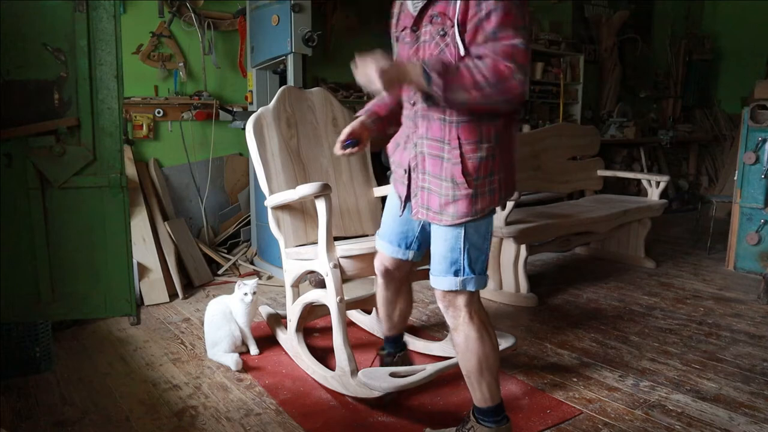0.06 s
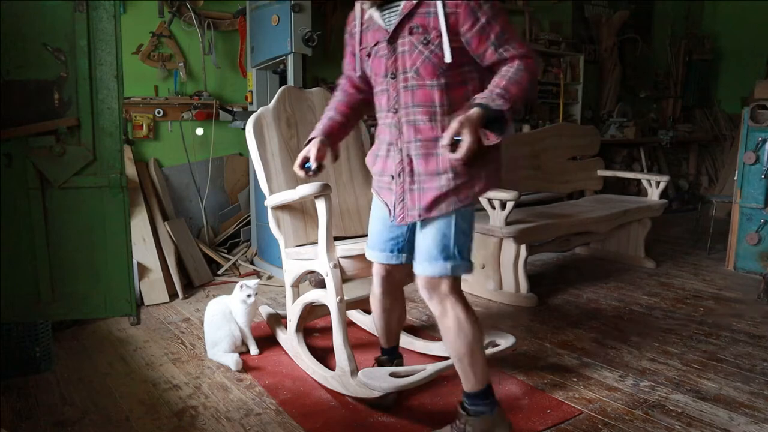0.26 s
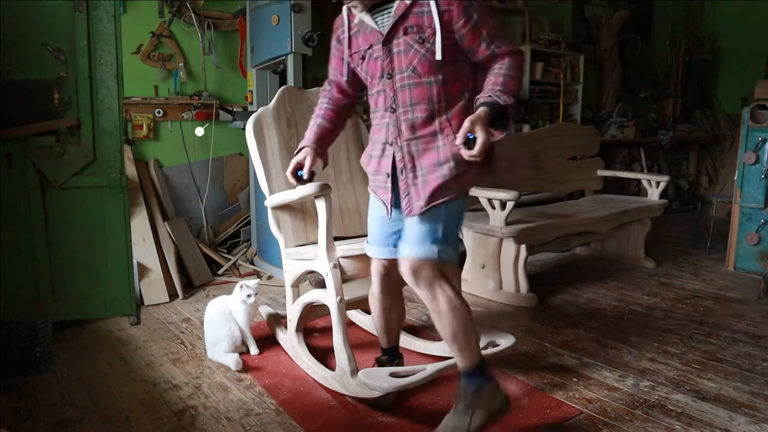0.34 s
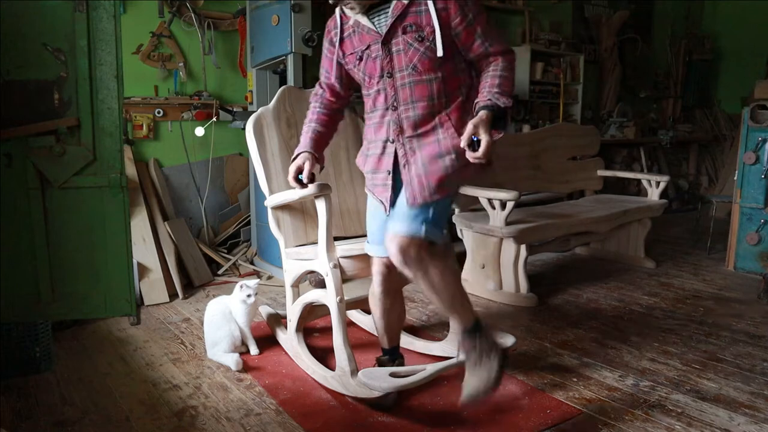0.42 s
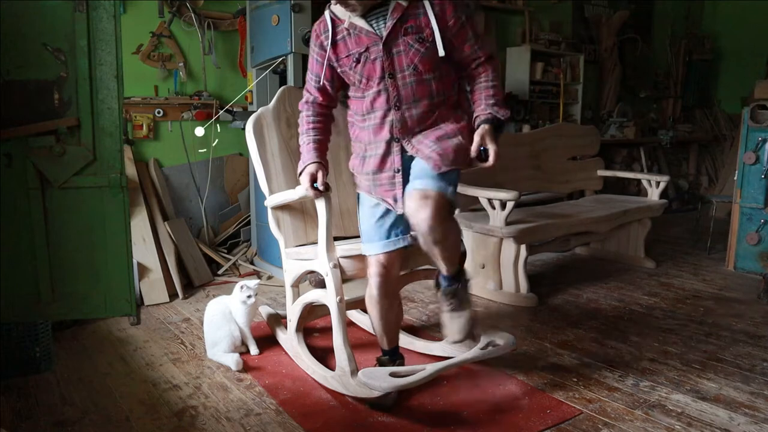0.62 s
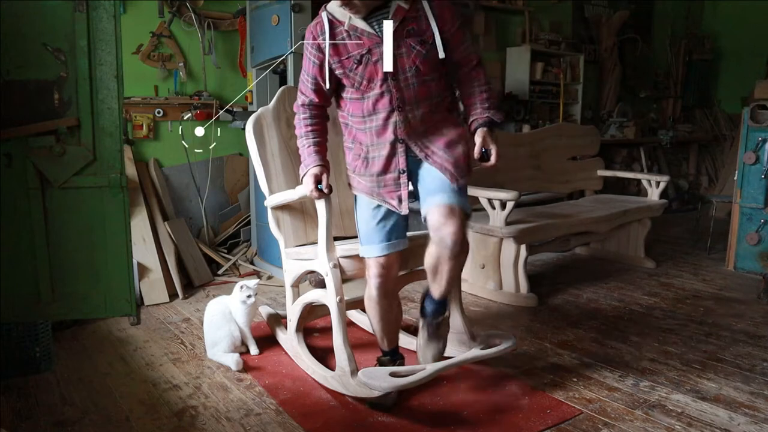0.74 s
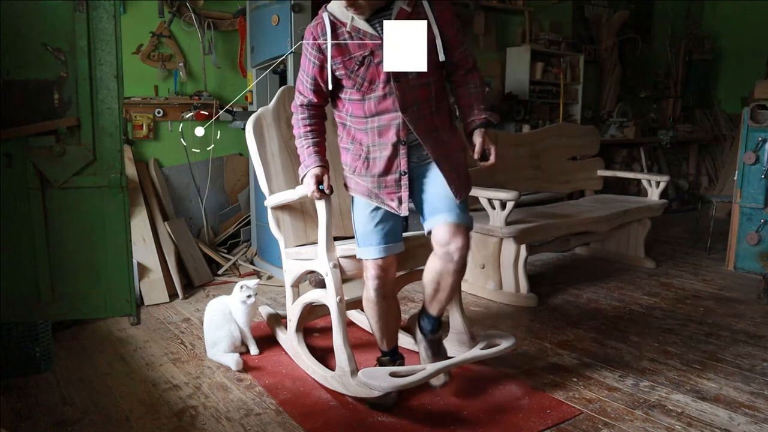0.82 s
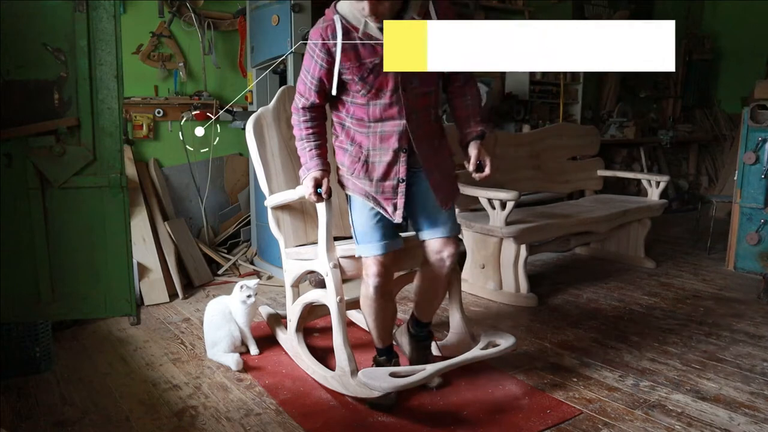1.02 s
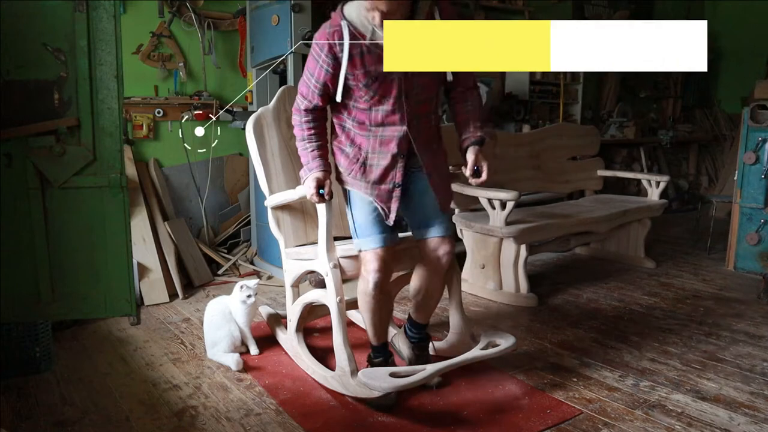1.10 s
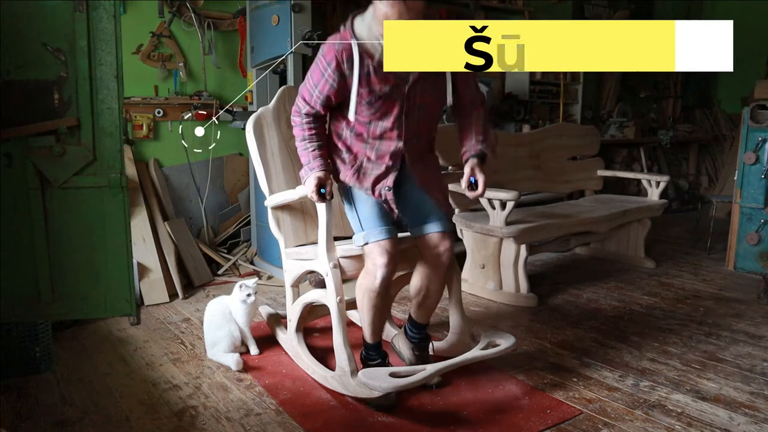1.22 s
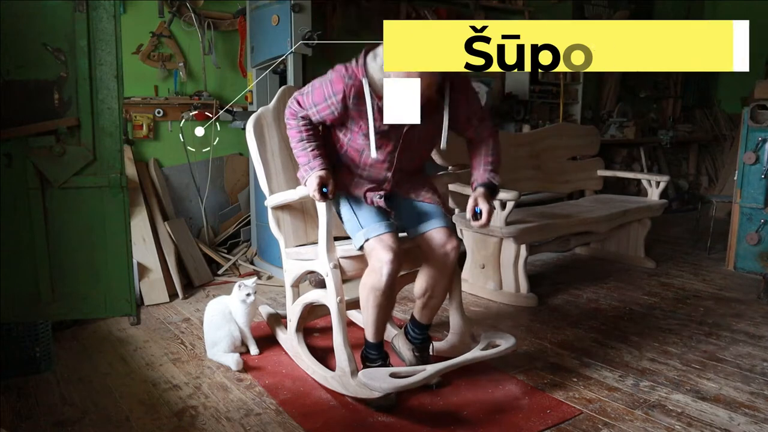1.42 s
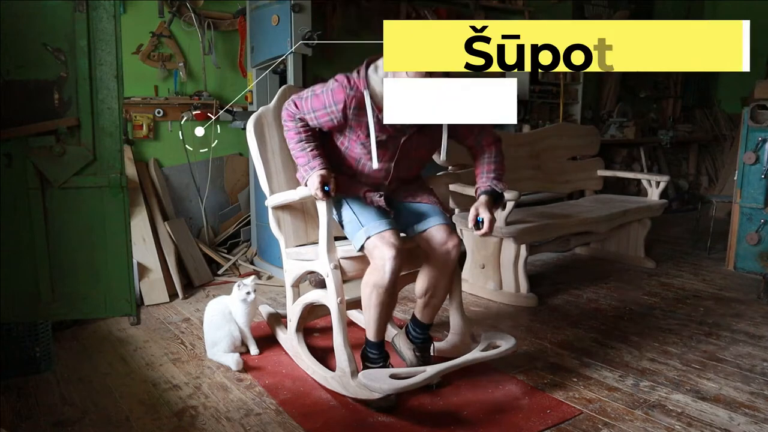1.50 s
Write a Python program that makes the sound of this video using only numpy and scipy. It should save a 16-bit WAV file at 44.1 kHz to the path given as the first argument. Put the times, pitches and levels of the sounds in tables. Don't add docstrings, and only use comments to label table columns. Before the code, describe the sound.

Footsteps on a wooden rocking chair's footboard: a quick cluster of low, bouncing thumps with a crisp grit snap, then light ticks, shuffling scuffs and softer thumps, heard fairly close in a hissy workshop.

```python
import sys
import numpy as np
from scipy import signal
from scipy.fft import rfft, irfft
from scipy.io import wavfile
from scipy.ndimage import uniform_filter1d

SR = 44100
rng = np.random.default_rng(int(sys.argv[2]) if len(sys.argv) > 2 else 0)


def wav_record(signal):
    frames = np.transpose(np.atleast_2d(signal))
    bounded = np.clip(frames, -1, 1)
    quanta = np.round(bounded * 32767).astype(np.int16)
    wavfile.write(sys.argv[1], SR, quanta)


def magnitude_from_level(level_db):
    exponent = np.asarray(level_db, float) / 20
    return 10 ** exponent


N = 68355


def evened(x):
    return x / np.sqrt(np.mean(x ** 2) + 1e-20)


def read(points, hz):
    point_hz, value = np.transpose(points)
    return np.interp(np.log(hz + 1), np.log(point_hz + 1), value)


def add(mix, start, sound):
    part = mix[..., round(start * SR):][..., :sound.shape[-1]]
    part += sound[..., :part.shape[-1]]


def ports(x):
    # (frequency [Hz], likeness [-1 to 1])
    likeness = [(60, 1), (130, 0.5), (290, -0.25), (630, -0.21), (1370, -0.29), (3000, -0.29),
                (6570, -0.73), (14400, -0.33)]
    left, other = rfft(x)
    same = np.clip(read(likeness, np.fft.rfftfreq(x.shape[1], 1 / SR)), -1, 1)
    right = same * left + np.sqrt(1 - same ** 2) * other
    return irfft(np.array([left, right]), x.shape[1])


def thump(ring_hz, length):
    t = np.arange(0, length, 1 / SR)
    upper = magnitude_from_level(-15) * np.cos(2 * np.pi * 1.9 * ring_hz * t)
    press = np.sin(np.pi * (t / length) ** 0.72)
    return press * (np.sin(2 * np.pi * ring_hz * t) + upper)


def board_thumps():
    # (time [s], level [dB], ringing [Hz], contact length [s])
    blow_table = [(.135, -54, 71.6, 0.057), (.2215, -30, 234, 0.007), (.229, -30, 75, 0.036),
                  (.251, -35.5, 170, 0.024), (.2815, -25, 157.5, .014), (.286, -24.5, 72, 0.033),
                  (.296, -33.5, 174, 0.0098), (.3165, -23.5, 150, 0.0222), (.350, -30, 98, 0.0266),
                  (.377, -27.5, 141, 0.019), (.396, -38.5, 55.4, 0.059), (.403, -32.5, 135, 0.014),
                  (.438, -39.5, 153, .035), (.485, -41, 132, 0.0146), (.50, -45.5, 50, .11),
                  (.66, -50.5, 55.6, 0.068), (.74, -59, 55.7, 0.072), (1.04, -49.5, 175, 0.021),
                  (1.083, -45, 76.2, 0.069), (1.11, -58, 143, 0.039), (1.19, -52, 115, 0.026),
                  (1.26, -51, 77.8, 0.1), (1.29, -50, 208, 0.027), (1.215, -50.5, 210, 0.038),
                  (1.24, -50.5, 45, .1), (.337, -38.5, 230, .02), (.268, -40.5, 257, 0.013),
                  (1.5, -52, 136, 0.032)]
    blows = np.zeros(N)
    for start, level_db, ring_hz, length in blow_table:
        add(blows, start, magnitude_from_level(level_db) * thump(ring_hz, length))
    return blows


def scuff(length, centre_hz, octaves):
    size = SR // 2
    grit_per_s, grit_db, grit_share = 2500, 4.0, 0.57
    rubbing = rng.standard_normal((2, size))
    hit = rng.random((2, size)) < grit_per_s / SR
    grain = np.minimum(rng.exponential(1, (2, size)), 5)
    grit = np.sign(rubbing) * hit * magnitude_from_level(grit_db * grain)
    drive = ports((1 - grit_share) * rubbing + grit_share * evened(grit))
    away = np.log2((np.fft.rfftfreq(size, 1 / SR) + 1) / centre_hz)
    body = np.exp(-0.5 * (away / octaves) ** 2)
    rub = evened(irfft(rfft(drive) * body, size))
    n = round(length * SR)
    stroke = np.sin(np.pi * (np.arange(n) / n) ** 0.8)
    return rub[:, :n] * stroke


def sole_scuffs():
    # (start [s], length [s], level [dB], centre [Hz], width [octaves])
    scuff_table = [(.218, .075, -46, 357, 0.51), (.28, 0.061, -45.5, 370, 0.72), (.34, 0.12, -48, 260, 0.8),
                   (.282, .1, -47.5, 760, 1.45), (.22, 0.054, -51.5, 950, 1.06),
                   (.222, 0.015, -50.5, 3800, 0.46), (.34, 0.14, -48.5, 950, 1.37),
                   (0.36, 0.036, -57.5, 7900, 0.81), (.48, 0.46, -58, 2300, 1.38),
                   (.65, 0.11, -54.5, 2700, 0.9), (.735, .1, -50, 1900, 0.76), (.8, 0.24, -51, 2140, 0.6),
                   (.78, 0.24, -58.5, 4840, 0.71), (1.07, 0.16, -53, 1170, 1.6),
                   (1.18, 0.14, -48, 860, 0.92), (1.2, 0.098, -49.5, 510, 0.32),
                   (1.19, 0.14, -52.5, 190, 0.49), (1.03, 0.16, -53, 490, 0.79),
                   (1.18, 0.12, -53, 2640, 0.92), (1.32, 0.26, -67, 2300, 1),
                   (1.46, 0.17, -55.5, 2340, 0.89)]
    rubs = np.zeros((2, N))
    for start, length, level_db, centre_hz, octaves in scuff_table:
        add(rubs, start, magnitude_from_level(level_db) * scuff(length, centre_hz, octaves))
    return rubs


def tick(centre_hz, t60):
    t = np.arange(0, 0.07, 1 / SR)
    ratios = np.geomspace(0.72, 1.5, num=6) * rng.uniform(0.911, 1.05, 6)
    phases = rng.uniform(0, np.pi, 6)
    ring = np.zeros(len(t))
    for ratio, phase in zip(ratios, phases):
        ring += np.sin(2 * np.pi * centre_hz * ratio * t + phase) / np.sqrt(ratio)
    onset = 1 - np.exp(-t * centre_hz)
    return magnitude_from_level(-60 * t / t60) / 2 * ring * onset


def snap(centre_hz):
    snap_s = 0.0001
    t = np.arange(0, 0.004, 1 / SR)
    pulse = t / snap_s * np.exp(1 - t / snap_s)
    return np.sin(2 * np.pi * centre_hz * t) * pulse


def sole_ticks():
    # (time [s], level [dB], centre [Hz], time to fade by 60 dB [s])
    tick_table = [(.2912, -36, 1500, 0.017), (.3331, -48, 1460, 0.0098), (.3805, -41, 1770, 0.028),
                  (.4150, -40, 1950, 0.012), (.7503, -34.5, 2980, 0.016), (.7806, -38.5, 1295, 0.036),
                  (.797, -39.5, 1230, 0.022), (.809, -48, 1520, 0.041), (1.0934, -46, 2300, 0.021),
                  (1.225, -42.5, 672, 0.034), (1.257, -39, 559, 0.072), (1.277, -43, 910, 0.026),
                  (1.302, -41.5, 619, 0.065)]
    # (time [s], level [dB], centre [Hz])
    snap_table = [
        (.4142, -27.5, 3000),
        (.2915, -41, 1900),
    ]
    ticks = np.zeros(N)
    for start, level_db, centre_hz, t60 in tick_table:
        add(ticks, start, magnitude_from_level(level_db) * tick(centre_hz, t60))
    for start, level_db, centre_hz in snap_table:
        add(ticks, start, magnitude_from_level(level_db) * snap(centre_hz))
    return ticks


def room(x):
    # (frequency [Hz], time to fade by 60 dB [s])
    fade_times = [(60, .6), (250, 0.25), (1000, 0.75), (4000, 0.56), (12000, 0.39)]
    taps = np.zeros((2, SR))
    at = np.arange(300, SR - 20, 20)
    at = at + rng.integers(0, 20, (2, len(at)))
    np.put_along_axis(taps, at, rng.choice([-1.0, 1.0], at.shape), 1)
    hz, t, z = signal.stft(ports(taps), SR, nperseg=512)
    fading = magnitude_from_level(-60 * t / read(fade_times, hz)[:, None])
    tail = signal.istft(z * fading, SR, nperseg=512)[1]
    hz = np.fft.rfftfreq(tail.shape[1], 1 / SR)
    even = irfft(rfft(tail) / np.sqrt(read(fade_times, hz)), tail.shape[1])
    even = even / np.linalg.norm(even[0])
    return signal.fftconvolve(x * np.ones((2, 1)), even, axes=1)[:, :N]


def hiss():
    # (frequency [Hz], level [dB per Hz])
    hiss_colour = [(15, -46), (25, -13), (154, -7.5), (724, -12), (997, -14.5), (1110, -15), (2900, -22),
                   (3690, -22.5), (14800, -37.5)]
    count, hz = N // 256 + 5, np.fft.rfftfreq(1024, 1 / SR)
    a, b, c, d, patches = rng.standard_normal((count, 513, 5)).T
    patches = uniform_filter1d(patches, size=14, axis=0)
    patches = evened(uniform_filter1d(patches, size=10, axis=1))
    z = np.array([a + 1j * b, c + 1j * d])
    z = z * magnitude_from_level(read(hiss_colour, hz)[:, None] + 1.1 * patches)
    noise = signal.istft(z, nperseg=1024, noverlap=768)[1][:, :N]
    return magnitude_from_level(-49.5) * evened(ports(noise))


def whine():
    return magnitude_from_level(-69.5) * np.sin(2 * np.pi * 3652 * np.arange(N) / SR)


def scene():
    blows, rubs, ticks = board_thumps(), sole_scuffs(), sole_ticks()
    wet = room(magnitude_from_level(-13.5) * blows + magnitude_from_level(-2) * rubs + magnitude_from_level(-4) * ticks)
    lean_right = magnitude_from_level([[-1.5], [1.5]])
    return blows + (ticks + rubs) * lean_right + wet + hiss() + whine()


def low_pass(x):
    return signal.sosfilt(signal.butter(12, 14960, fs=SR, output="sos"), x)


def record(dry):
    low_hz, top_hz = 28, 13150
    x = signal.sosfiltfilt(signal.butter(2, low_hz, "high", fs=SR, output="sos"), dry)
    x = signal.sosfilt(signal.butter(4, top_hz, fs=SR, output="sos"), x)
    start_s, fade_s = 0.0024, 0.014
    fade = np.clip((np.arange(N) / SR - start_s) / fade_s, 0, 1)
    return low_pass(x * fade)


dry = scene()
out = record(dry)
wav_record(out)
```